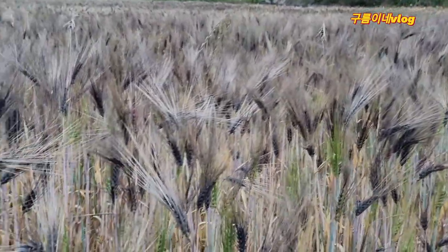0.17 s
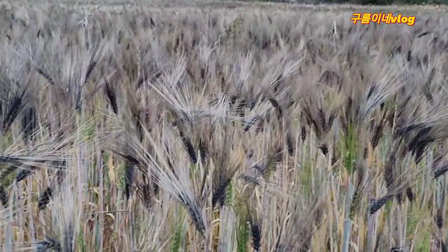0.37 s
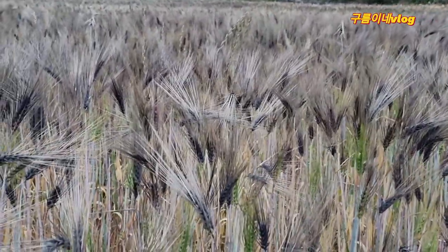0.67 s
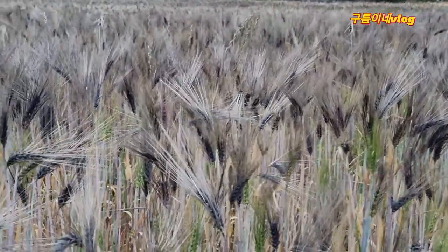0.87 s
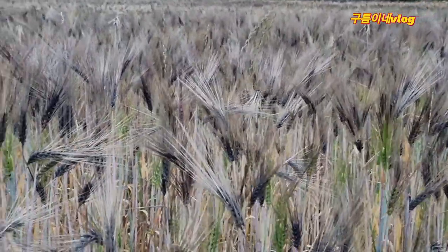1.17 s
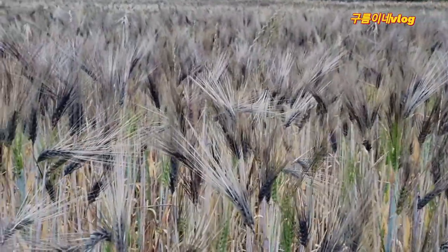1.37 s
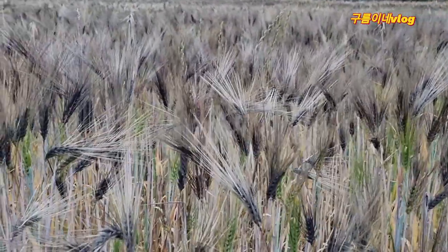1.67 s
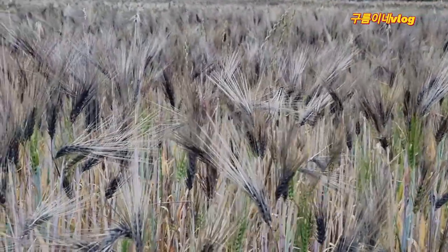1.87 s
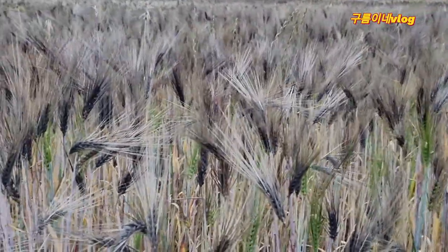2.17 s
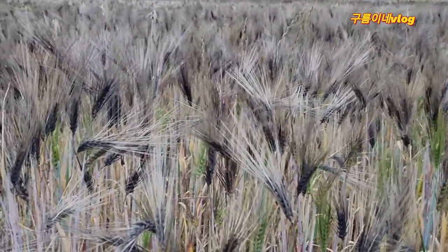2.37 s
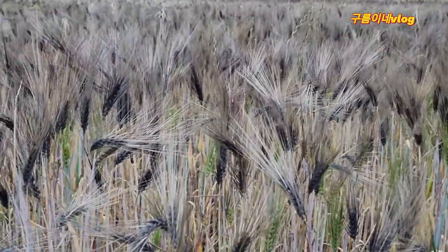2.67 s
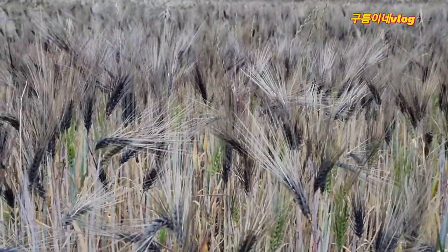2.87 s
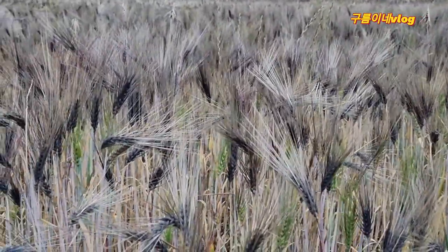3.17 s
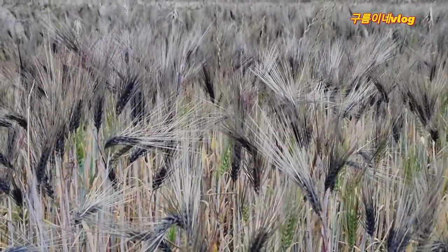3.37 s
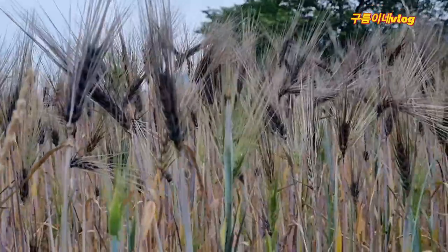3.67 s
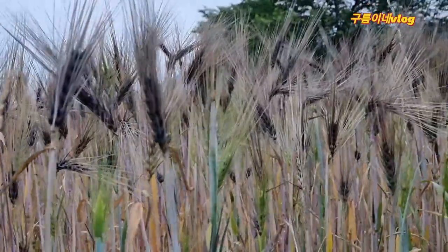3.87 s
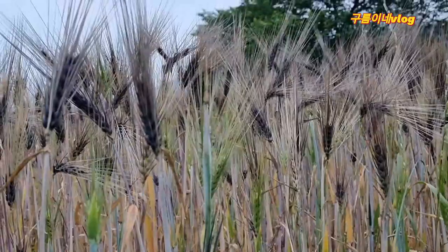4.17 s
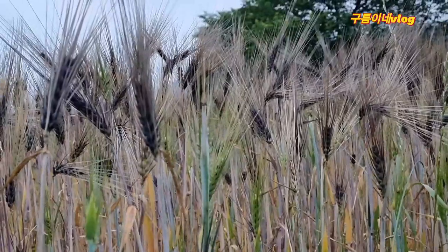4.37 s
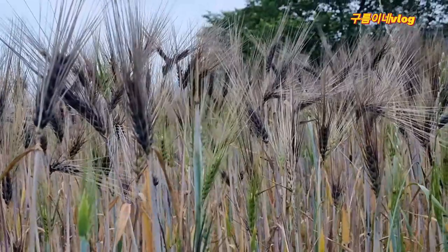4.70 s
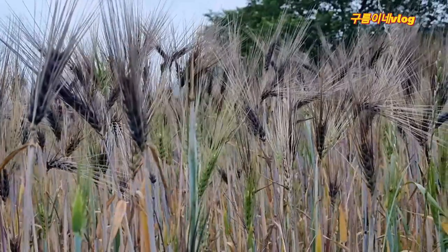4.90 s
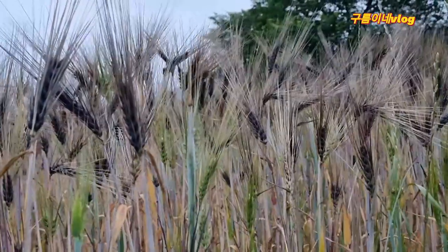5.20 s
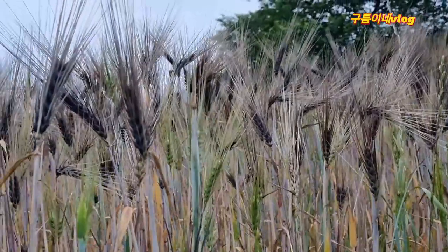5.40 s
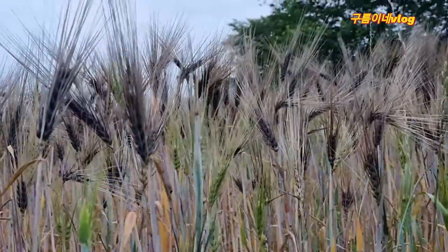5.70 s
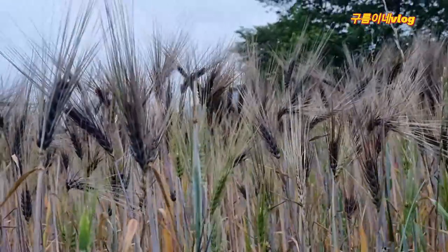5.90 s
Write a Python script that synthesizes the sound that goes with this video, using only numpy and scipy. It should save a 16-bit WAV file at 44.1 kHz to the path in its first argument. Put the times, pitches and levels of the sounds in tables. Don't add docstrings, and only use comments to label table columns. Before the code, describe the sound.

Soft gusts, distant roar and faint machine hum with thin birdsong, then a closer swish among crackling stalks, ending in several dull handling knocks.

```python
import sys
import numpy as np
from scipy import signal
from scipy.io import wavfile
from scipy.ndimage import uniform_filter1d

SR = 44100
rng = np.random.default_rng(int(sys.argv[2]) if len(sys.argv) > 2 else 0)


def magnitude_from_level(level_db):
    exponent = np.asarray(level_db, float) / 20
    return 10 ** exponent


def master(y):
    cut = np.clip(np.atleast_2d(y).T, -1, 1)
    pcm = np.round(cut * 32767)
    wavfile.write(sys.argv[1], SR, pcm.astype(np.int16))


N = 266540
TIME = np.arange(N) / SR

CHANGE_S = 3.535, 3.555


def evened(x):
    return x / np.sqrt(np.mean(x ** 2) + 1e-20)


def waver(shape, size):
    return evened(uniform_filter1d(rng.standard_normal(shape), size=size))


def tone(hz):
    return np.sin(2 * np.pi * np.cumsum(hz) / SR)


def bell(t, middle, width):
    return np.exp(-((t - middle) / width) ** 2)


def read(points, hz):
    f, value = np.transpose(points)
    return np.interp(np.log(hz + 1), np.log(f + 1), value)


def curve(rows, column):
    return np.interp(TIME, *np.transpose(rows)[[0, column]])


def placed(pair):
    return np.interp(TIME, CHANGE_S, pair)


def lumpy(base_db, rows, half):
    lumps = sum((magnitude_from_level(db) * bell(TIME, s, half)) ** 2 for s, db in rows)
    return np.sqrt(magnitude_from_level(base_db) ** 2 + lumps)


def band(x, lo_hz, hi_hz):
    edges = [lo_hz, min(hi_hz, 20000)]
    return signal.sosfilt(signal.butter(N=2, Wn=edges, btype="band", fs=SR, output="sos"), x)


def steep_band(x, lo_hz, hi_hz):
    return band(band(x, lo_hz, hi_hz), lo_hz, hi_hz)


def add(mix, s, sound, pan_db=0.):
    part = mix[:, round(s * SR):][:, :sound.shape[-1]]
    part += (magnitude_from_level(np.array([[pan_db], [-pan_db]]) / 2) * sound)[:, :part.shape[1]]


def wash(spectra, level_db, lo_hz, hi_hz, patchy_db, flicker_db, size, span):
    # f/Hz, likeness -1 to 1
    likeness = [
        [(60, .96), (400, .85), (600, .68), (950, .8), (1380, .4), (1850, -.3), (2600, .45), (2950, .2), (3400, -.6), (3900, -.55), (4500, .3), (5300, -.3), (7000, 0)],
        [(60, .85), (350, .7), (1030, .68), (1380, .3), (1750, .55), (2070, .25), (2350, .42), (2800, .2), (3300, .4), (3700, .12), (15000, .05)],
    ]
    # f/Hz, lag/rad
    lag = [
        [(300, 0), (1200, .55), (2000, 0)],
        [(350, 0), (1030, 1), (1800, 2.8), (2400, 5.4), (2900, 7.9), (3400, 9.3)],
    ]
    # f/Hz, level/dB
    lean = [
        [(60, 1), (500, 0.5), (1170, -1.5), (1800, 4.5), (2700, -0.5), (3500, -6), (4100, -6.5), (4800, 3.5), (5600, -4.5), (6400, -0.5), (9800, 2), (15000, -3.5)],
        [(60, -0.5), (130, 2), (290, 0.5), (640, -1.5), (1410, 1.3), (3100, -1.5), (6820, 0.5), (15000, -0.5)],
    ]
    frames, hz = 4 * N // size + 5, np.fft.rfftfreq(size, 1 / SR)
    low = np.interp(np.arange(frames) * size / 4 / SR, CHANGE_S, [0, 1])

    def blend(pair):
        return read(pair[0], hz)[:, None] * (1 - low) + read(pair[1], hz)[:, None] * low

    a, b, c, d, patches = rng.standard_normal((frames, len(hz), 5)).T
    patches = evened(uniform_filter1d(uniform_filter1d(patches, size=6, axis=0), size=12, axis=1))
    flicker = waver(frames, 3)
    colour = magnitude_from_level(blend(spectra))
    colour /= np.linalg.norm(colour[(hz >= lo_hz) & (hz <= hi_hz)], axis=0)

    same = np.clip(blend(likeness), -1, 1)
    left, own = a + 1j * b, c + 1j * d
    right = same * np.exp(-1j * blend(lag)) * left + np.sqrt(1 - same ** 2) * own
    uneven_db = (1 - 1.75 * low) * (patchy_db * patches + flicker_db * flicker)
    side_db = np.array([.5, -.5])[:, None, None] * blend(lean)
    z = np.array([left, right]) * colour * magnitude_from_level(uneven_db + side_db)
    x = signal.istft(z, nperseg=size, noverlap=3 * size // 4)[1][:, :N]
    running = np.sqrt(uniform_filter1d(band(x.mean(0), lo_hz, hi_hz) ** 2, int(span * SR)) + 1e-20)
    return x / running * magnitude_from_level(level_db)


def crackle():
    clicks_per_s = 40
    size = magnitude_from_level(4.5 * np.minimum(rng.exponential(1, (2, N)), 4))
    size = size * (rng.random((2, N)) < clicks_per_s / SR)
    grain = rng.standard_normal(60) * np.exp(-np.arange(60) / 14)
    clicks = signal.oaconvolve(size, grain[None])[:, :N]
    return evened(steep_band(clicks, 9500, 15000))


def wind():
    # f/Hz, density/dB
    rumble_spectra = [
        [(12, -13), (20, -11), (30, -11), (42, -30), (52, -3), (75, 2.5), (105, -3.5), (150, -9.5), (210, -14.5), (260, -22.5), (420, -32.5), (600, -24.5), (1100, -120)],
        [(12, -24), (20, -44), (33, -42), (44, -23), (55, 2), (74, 0.5), (100, -5.5), (120, -9.5), (175, -11), (230, -18), (330, -21.5), (420, -30), (600, -36), (1100, -120)],
    ]
    roar_spectra = [
        [(240, -14.5), (400, -12.5), (632, -16), (936, -1), (1130, -6), (1290, -3.5), (1440, -12), (2680, -13.5), (3200, -17), (4750, -15.5), (6040, -20.5), (7400, -26.5), (8300, -35.5), (10800, -31.5), (18300, -120)],
        [(240, -9), (400, -11), (529, -4), (814, -7), (948, -0.5), (1340, -4), (1480, -6.5), (2220, -5.5), (3160, -11.5), (3980, -10.5), (8300, -32), (10800, -54), (18300, -120)],
    ]
    rustle_spectra = [
        [(4900, -46), (7500, -15), (8000, -24), (8500, -22), (8900, -17), (9300, -11), (11000, -10), (12300, -2), (13800, 0), (15000, -3), (15800, -4), (15950, -40), (16500, -60)],
        [(4900, -24), (8500, 0), (10300, -3), (11400, -5), (13500, -1), (15800, -2), (15950, -40), (16500, -60)],
    ]
    # t/s, level/dB
    sway = [(0, -0.5), (.67, -0.5), (1.28, 3), (1.64, 2), (2.16, 3), (2.7, 4.5), (3.38, 1), (3.5, 2),
            (3.56, 3), (3.84, 8), (4.12, 3), (4.47, 2.5), (5.19, 5), (5.33, 1.5), (5.55, 3.5), (6.04, 8.5)]
    # middle t/s, level/dB
    lumps = [(.06, -64), (.19, -56), (.26, -66), (.36, -60), (.55, -59), (.75, -59), (.93, -74),
             (1.13, -63), (1.4, -59), (1.5, -56.5), (1.67, -55), (1.77, -58), (1.891, -58.5), (2.03, -57.5),
             (2.2, -56.5), (2.36, -60), (2.43, -59.5), (2.57, -64), (2.67, -56.5), (2.86, -76), (3.14, -65),
             (3.42, -58), (3.53, -55), (3.76, -60), (3.9, -61), (4.21, -60), (4.3, -54.5), (4.57, -67),
             (4.71, -58), (4.84, -62)]
    sway_db = curve(sway, column=1)
    lull_db = np.where(TIME < 5.7, placed((-60, -58)), -56.5)
    gusts = lumpy(uniform_filter1d(lull_db, size=2000), lumps, half=0.03)
    rumble = gusts * wash(rumble_spectra, 0, lo_hz=54.5, hi_hz=205,
                          patchy_db=1.16, flicker_db=2.0, size=4096, span=0.2)
    roar_db = placed((-63.5, -69.5)) + 0.22 * sway_db
    roar = wash(roar_spectra, roar_db, lo_hz=620, hi_hz=3470,
                patchy_db=1.04, flicker_db=0.04, size=512, span=0.23)
    rustle_db = placed((-81, -89)) + sway_db
    rustle = wash(rustle_spectra, rustle_db, lo_hz=8900, hi_hz=15800,
                  patchy_db=0.5, flicker_db=1.5, size=256, span=0.042)
    return rumble + roar + rustle + magnitude_from_level(rustle_db - 12.5) * crackle()


def hollow():
    top_s, top_db, slope_db_per_s, drop_db = 3.3, -63, 9, -23
    a, b = rng.standard_normal((2, N))
    db = top_db - slope_db_per_s * abs(TIME - top_s) + placed((0, drop_db))
    noise = np.array([a + 0.38 * b, a - 0.23 * b])
    return magnitude_from_level(db) * evened(band(band(noise, 800, 1010), 780, 1020))


def settling():
    level_db, settle_s = -76.5, 0.75
    swish = evened(steep_band(rng.standard_normal((2, N)), 4300, 7100))
    return magnitude_from_level(level_db) * swish * placed((0, 1)) * bell(TIME, CHANGE_S[1], settle_s)


def drone():
    # middle t/s, level/dB
    swells = [(2.41, -57), (2.86, -48.5), (3.38, -56), (3.51, -61), (3.8, -52), (3.96, -50), (4.072, -50),
              (4.225, -53)]
    # multiple of its f, level/dB
    companions = [
        (2, -17),
        (2.5, -16),
        (3.05, -17),
    ]
    low_hz, low_db = 25.3, -66
    hum_hz, hum_db = placed((54.2, 57.4)), placed((-67, -57))
    wander_hz = waver(N, 9000)
    low = magnitude_from_level(low_db) * tone(low_hz + wander_hz / 2)
    hum = lumpy(hum_db, swells, half=0.013) * tone(hum_hz + wander_hz)
    for multiple, db in companions:
        drift = waver(N, 6000)
        hum = hum + magnitude_from_level(hum_db + db + 2.9 * drift) * tone(multiple * hum_hz + 2 * drift)
    return np.sqrt(2) * (low + hum) * magnitude_from_level(np.array([[.8], [-.8]]))


def buzz(db):
    t, pulses_per_s = np.arange(0, .072, 1 / SR), 166
    chop = np.sin(np.pi * (pulses_per_s * t + rng.random())) ** 2
    husk = waver((2, len(t)), 90)
    fall_hz = rng.uniform(520, 760) * np.exp(-t / .05)
    pulse_hz = rng.uniform(130, 230) * np.cos(2 * np.pi * pulses_per_s * t)
    hz = 5740 + fall_hz - pulse_hz + 110 * husk[0]
    swell = np.minimum(t / .018, 1) * np.minimum((t[-1] - t) / .003, 1)
    swell = swell * magnitude_from_level(2.8 * husk[1] + rng.uniform(-4, 4) * (t / t[-1] - .5))
    turn = 2 * np.pi * np.cumsum(hz) / SR - np.array([[0], [1.9]])
    return magnitude_from_level(db - 2.2) * evened(chop * np.sin(turn)) * swell


def sweep(hz, db):
    length_s, rise = .04, 1.95
    u = np.arange(0, 1, 1 / (length_s * SR))
    flutter_db = 3.5 * waver(len(u), 200)
    voice = tone(hz * (1 + (rise - 1) * u))
    return magnitude_from_level(db + flutter_db) * np.sqrt(2) * voice * np.sin(np.pi * u ** .8)


def note(length, from_hz, to_hz, warble_hz, db, swell_db=0.):
    t = np.arange(0, length, 1 / SR)
    warble = warble_hz * np.minimum(t / .022, 1) * np.sin(2 * np.pi * 135 * t)
    hz = np.linspace(from_hz, to_hz, len(t)) + warble
    broken_db = 3 * waver((2, len(t)), 130) - 2 + swell_db * (t / length - .5)
    return magnitude_from_level(db + broken_db) * np.sqrt(2) * tone(hz) * signal.windows.tukey(len(t), .6)


def whistle(length, held_hz, held_db):
    droop_s, droop_to, droop_db = .075, .8, -79.5
    t = np.arange(0, length, 1 / SR)
    droop = np.clip(1 - (length - t) / droop_s, 0, 1)
    hz = held_hz * (1 - (1 - droop_to) * droop)
    db = held_db + (droop_db - held_db) * np.minimum(4 * droop + bell(t, .03, .03), 1)
    flutter_db = 3.5 * waver(len(t), 500) - 3.5
    return magnitude_from_level(db + flutter_db) * tone(hz) * signal.windows.tukey(len(t), .15)


def skin(half, db, lo_hz, hi_hz):
    t = np.arange(-3 * half, 3 * half, 1 / SR)
    hiss = evened(steep_band(rng.standard_normal((2, len(t))), lo_hz, hi_hz))
    return magnitude_from_level(db) * hiss * np.exp(-abs(t / half) ** 1.14)


def birds():
    # middle t/s, level/dB, left minus right/dB
    buzzes = [(.19, -69.5, -8), (.453, -71, -9), (.723, -70, -7), (1.012, -70, -8), (1.299, -71, -8),
              (1.565, -72, -9), (1.833, -71, -9), (2.096, -71, -9), (2.337, -70.5, -8), (2.628, -70.5, -7),
              (2.939, -74, -6), (3.256, -67.5, -9), (3.785, -76, 3), (4.094, -74.5, 3), (4.417, -76, 7),
              (4.753, -80, 4), (5.045, -76, 2), (5.283, -76.5, 3), (5.558, -73, 5), (5.895, -71, 4)]
    # t/s, from f/Hz, level/dB
    sweeps = [(.082, 3600, -78), (.187, 3900, -78), (.283, 3700, -79), (.391, 3700, -76), (.402, 3300, -81),
              (.499, 3500, -76), (.888, 3500, -79), (.972, 3800, -83), (1.14, 3700, -81),
              (2.475, 3800, -82)]
    # t/s, from f/Hz, to f/Hz, level/dB, left minus right/dB
    chirps = [(1.383, 3500, 3850, -76, 6), (1.407, 4300, 5000, -78, 8), (1.961, 5800, 5700, -67, -6),
              (2.397, 4800, 5160, -79, 6), (2.66, 5400, 5200, -80, 2), (2.94, 4100, 3750, -77, -11),
              (3.464, 4700, 5600, -76, 8), (3.522, 3800, 3600, -79, 0)]
    # t/s, length/s, f/Hz, level/dB
    peeps = [(.393, .02, 4150, -69), (1.376, .013, 2750, -64), (.622, .02, 3700, -80),
             (3.195, .075, 4220, -77), (3.295, .04, 4750, -76), (2.513, .02, 5750, -75),
             (3.968, .016, 4300, -74)]
    # t/s, length/s, from f/Hz, to f/Hz
    trills = [
        (3.33, .05, 3950, 4650),
        (3.43, .042, 4300, 4500),
    ]
    # t/s, length/s, held f/Hz, held level/dB
    whistles = [
        (5.305, .27, 4620, -87),
        (5.66, .23, 4820, -88),
    ]
    out = np.zeros((2, N))
    for s, db, pan_db in buzzes:
        add(out, s - .038, buzz(db), pan_db - 3 * (pan_db < 0))
    for s, hz, db in sweeps:
        add(out, s, sweep(hz, db), 14)
    for s, from_hz, to_hz, db, pan_db in chirps:
        add(out, s, note(.027, from_hz, to_hz, 180, db), pan_db)
    for s, length, hz, db in peeps:
        add(out, s, note(length, hz, hz, 0, db), 8.)
    trill_db, trill_pan_db = -65, 5
    for s, *shape in trills:
        add(out, s - .008, skin(.011, trill_db - 4, 3700, 5100), trill_pan_db)
        add(out, s, note(*shape, 600, trill_db, swell_db=5), trill_pan_db)
    for s, *voice in whistles:
        add(out, s, whistle(*voice), 9.)
    echoes = rng.standard_normal((2, 2000)) * np.exp(-np.arange(2000) / 500)
    echoes = echoes / np.linalg.norm(echoes[0])
    return out + magnitude_from_level(-7) * signal.oaconvolve(out, echoes, axes=1)[:, :N]


def snaps():
    # t/s, woody level/dB, brittle level/dB, brittle centre f/Hz, left minus right/dB
    breaks = [(2.447, -66, -68, 11200, 6), (2.668, -90, -73, 13500, 0), (2.8084, -89, -63, 13600, -3),
              (2.851, -90, -73, 13500, 0), (3.566, -69, -79, 13800, -3), (3.576, -63.5, -86, 12500, -4),
              (3.663, -68, -82, 11500, -3), (3.7085, -55, -73.5, 12000, -4), (3.797, -60, -74, 13000, -4),
              (3.812, -70, -72.5, 10600, -10), (3.854, -71, -76, 11100, -1.5), (3.861, -85, -79, 12500, 0),
              (3.8716, -68, -85, 9000, -4), (3.948, -58, -80, 9500, 2), (4.2624, -76, -78, 12000, -8),
              (4.2894, -80.5, -81, 11000, 3), (4.551, -79, -84, 9500, 5), (4.56, -90, -86, 9000, 0),
              (4.611, -87, -79, 9500, 0), (4.722, -76, -75, 10500, 3), (4.755, -61, -79, 12500, 8),
              (5.1299, -72, -76, 11500, 7), (5.196, -71, -74, 13000, 2), (5.214, -73, -73, 12500, 2),
              (5.368, -75, -83, 9000, 6), (5.495, -84, -87, 9000, 2), (5.6675, -86, -71, 13000, -2.5),
              (5.685, -79, -69, 12000, -5), (5.71, -68.5, -80, 11000, 10), (5.8384, -70, -72, 10500, 3)]
    # from f/Hz, to f/Hz, level/dB
    fibres = (2350, 3150, -4), (3200, 4400, -3.5), (4500, 5400, -6), (5500, 7300, 1)
    out, t = np.zeros((2, N)), np.arange(400) / SR
    for s, wood_db, brittle_db, hz, pan_db in breaks:
        burst = rng.standard_normal((2, 400)) * (t / .0006 * np.exp(-t / 0.0004) + .04 * np.exp(-t / .002))
        burst = np.array([burst[0], .75 * burst[1] - .65 * np.roll(burst[0], 8)])
        wood = 0
        for lo, hi, db in fibres:
            part = steep_band(burst, lo, hi)
            wood = wood + magnitude_from_level(db) * part / np.std(part[0] + .4 * part[1])
        brittle = band(burst, .84 * hz, min(1.2 * hz, 15500))
        brittle = band(brittle, .78 * hz, min(1.3 * hz, 15800))
        add(out, s, magnitude_from_level(wood_db) * evened(wood) + magnitude_from_level(brittle_db) * evened(brittle), pan_db)
    return out


def bend(t, hz, slowing_s, spread_s):
    t = np.maximum(t, 0)
    turns = hz * slowing_s * (1 - np.exp(-t / slowing_s))
    return np.cos(2 * np.pi * turns) * bell(t, .0025, spread_s) * np.minimum(t / 0.0012, 1)


def ring(t):
    t = np.maximum(t, 0)
    low = -np.cos(2 * np.pi * 67 * (t - .0018)) * np.exp(-(t / .033) ** 2.9)
    overtone = -.45 * np.cos(2 * np.pi * 150 * (t - .0033)) * np.exp(-t / 0.006)
    return (low + overtone) * np.minimum(t / 0.00313, 1)


def nail(t, dull_db, bright_db, airy_db):
    burst = rng.standard_normal(len(t)) * np.exp(-np.maximum(t, 0) / .0004) * (t > 0)
    ranges = (dull_db, 1300, 2400), (bright_db, 7000, 10000), (airy_db, 10500, 15500)
    return sum(magnitude_from_level(db) * evened(steep_band(burst, lo, hi)) for db, lo, hi in ranges)


def knock(tick_db, bend_db, speed, ring_db, edge, slip):
    # f/Hz, level/dB, decay by 60 dB/s
    modes = [(2740, -4.5, 0.0059), (3580, 1.5, 0.0038), (4500, 3.0, 0.004),
             (5900, -7.5, 0.0058), (13500, -18, 0.0039)]
    *nail_db, give = edge
    t = np.arange(4000) / SR - .008
    late = np.maximum(t - .0009, 0)
    shell = 0
    for hz, db, t60 in modes:
        detuned_hz = hz * rng.uniform(0.98, 1.01)
        shell = shell + magnitude_from_level(db - 60 * late / t60) * np.sin(2 * np.pi * detuned_hz * late)
    tick = magnitude_from_level(tick_db) * (-bell(t, .001, .0001) - shell) + nail(late, *nail_db)
    far_tick = magnitude_from_level(-25.5) * np.roll(band(tick, 1500, 9000) + 1.6 * tick, 14)

    press = 0.3 * bell(t, -0.003, 0.0028) - slip * bell(t, -.0007, .0009)
    near_give = give * (bell(t, .0002, 0.00065) - 0.5 * bell(t, -0.0007, 0.00065))
    far_give = (.6 + give) * bell(t, .0016, 0.00065)
    near_bend = bend(0.0013 + speed * (t - .00135), 640, .0032, .003) + near_give
    far_bend = bend(.0015 + 1.65 * (t - .0024), 585, .0045, .0016) - far_give
    near = magnitude_from_level(bend_db) * near_bend + magnitude_from_level(ring_db) * (ring(t) + press)
    far = magnitude_from_level(bend_db - 10) * far_bend - magnitude_from_level(ring_db - 10) * (ring(t - .0006) + .4 * press)
    return np.array([near + tick, far + far_tick])


def hand():
    knock_s = 5.1677, 5.2709, 5.5774, 5.9017, 5.957
    # tick level/dB, bending wave level/dB, its speed factor, low ring level/dB, surrounding noise
    # level/dB
    blows = [
        (-36.5, -27.5, 1.4, -24, -60.5),
        (-38, -21, 1.15, -24, -65),
        (-36, -21.3, 1.13, -24.5, -61),
        (-36, -21.3, 1.17, -24, -59.5),
        (-37, -20.5, 1.17, -22.5, -62),
    ]
    creaks = -58, -59, -60, -56, -53
    # dull level/dB, bright level/dB, airy level/dB, give of the case 0-1
    nails = [
        (-86, -74, -74, 0),
        (-65, -72, -66.5, 0.22),
        (-64.5, -71, -74, 0),
        (-61, -67, -63, 0.08),
        (-65, -77, -70, 0.55),
    ]
    slips = .3, 0, .2, .12, .05
    # middle t/s, half length/s, level/dB
    rubs = [(5.125, 0.016, -80), (5.211, 0.021, -74.5), (5.372, .02, -78), (5.885, 0.018, -77),
            (5.906, 0.012, -69), (5.983, 0.011, -77)]
    # t/s, level/dB
    husks = [(1.3645, -57), (1.372, -57), (1.38, -60), (1.3845, -59)]
    out = np.zeros((2, N))
    for s, (*blow, hiss_db), creak_db, edge, slip in zip(knock_s, blows, creaks, nails, slips):
        add(out, s - .008, knock(*blow, edge, slip))
        add(out, s - .029, skin(.01, hiss_db, 890, 5900), 9.)
        add(out, s - .021, skin(.006, creak_db, 400, 600), 7.)
    for s, half, db in rubs:
        add(out, s - 3 * half, skin(half, db, 8500, 15000), 5.)
    touch_s, touch_db = 1.3392, -42.5
    t = np.arange(800) / SR
    touch = bend(2.3 * t, 585, .0045, .0018) + .18 * np.sin(2 * np.pi * 1000 * t) * np.exp(-t / .006)
    add(out, touch_s, magnitude_from_level(touch_db - 6) * touch, 16.)
    for s, db in husks:
        add(out, s - .002, skin(.0008, db, 2300, 3400), 4.)
    return out


def scene():
    return wind() + hollow() + settling() + drone() + birds() + snaps() + hand()


def low_pass(x):
    return signal.sosfilt(signal.butter(12, 16620, fs=SR, output="sos"), x)


def record(dry):
    edge = signal.firwin(255, 16600, window=("kaiser", 9), fs=SR)
    mix = signal.oaconvolve(dry, edge[None], "same")
    return low_pass(mix)


dry = scene()
out = record(dry)
master(out)
```